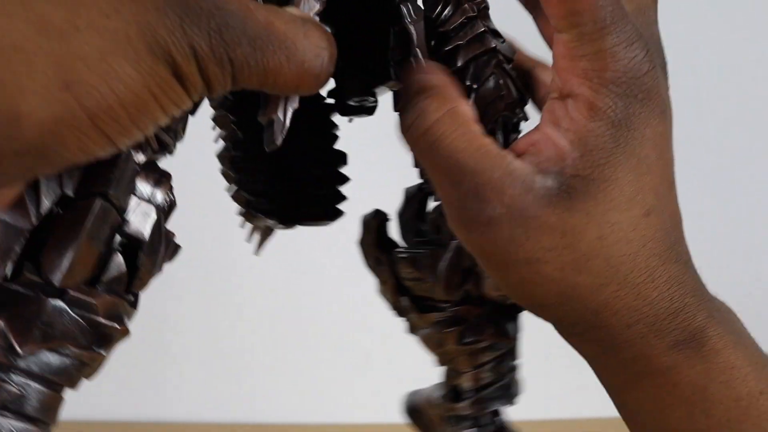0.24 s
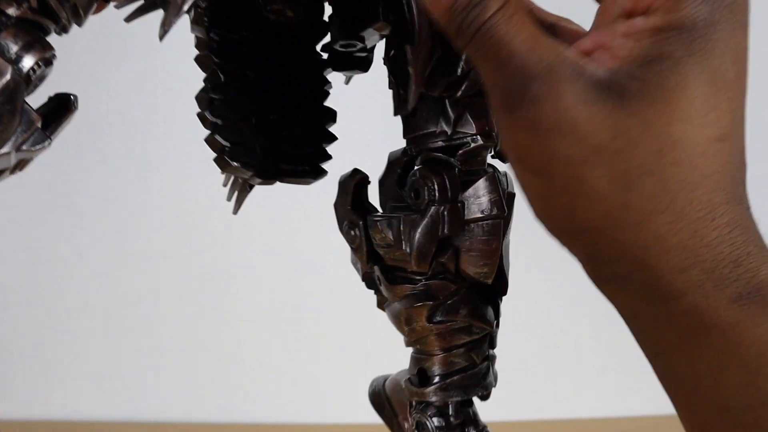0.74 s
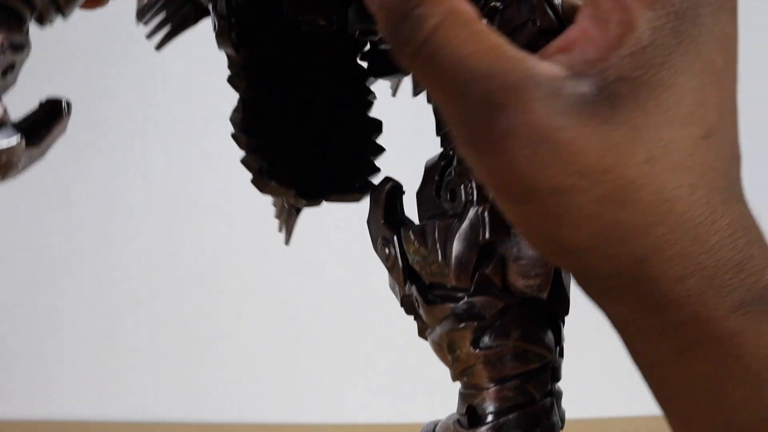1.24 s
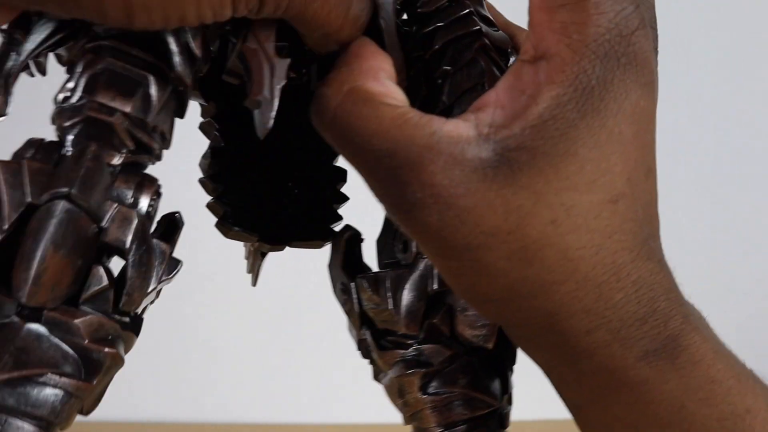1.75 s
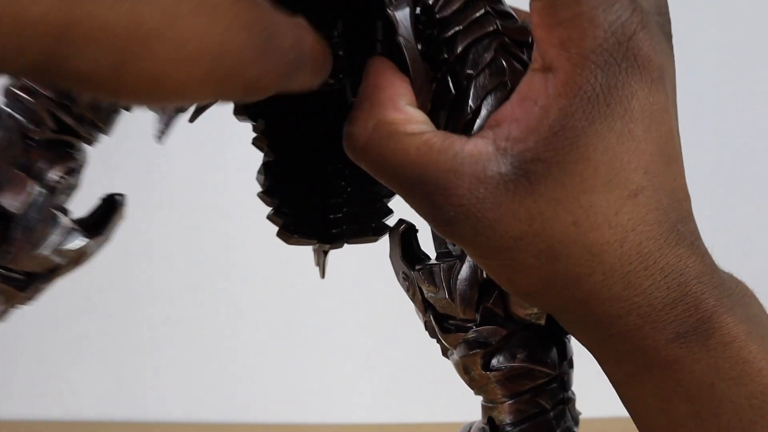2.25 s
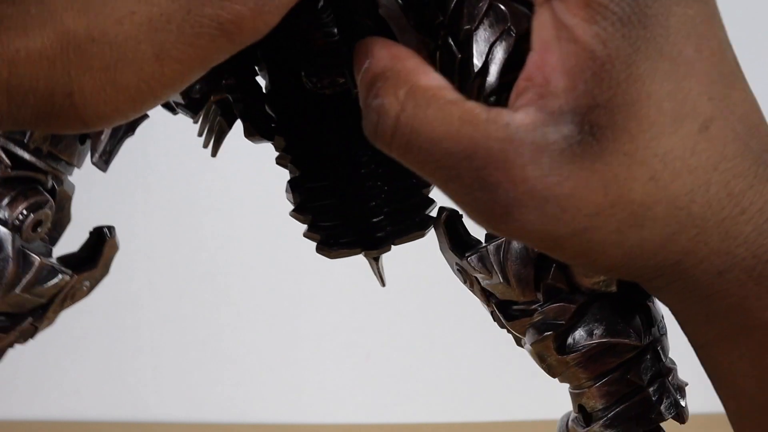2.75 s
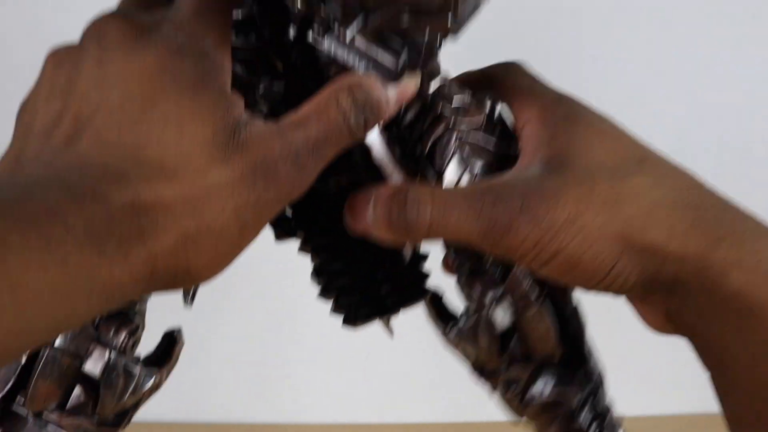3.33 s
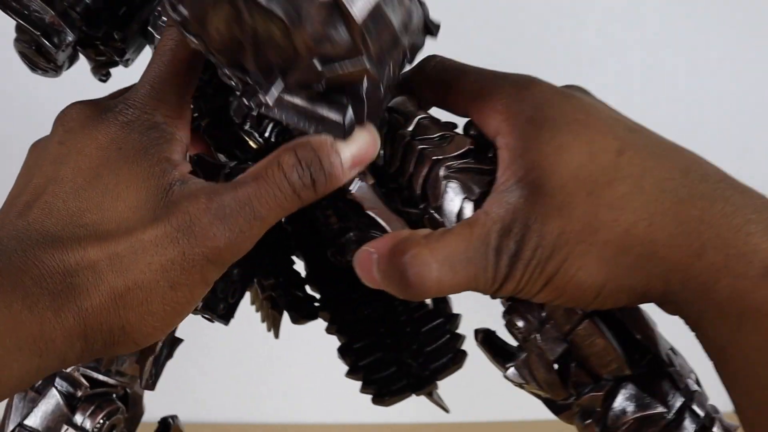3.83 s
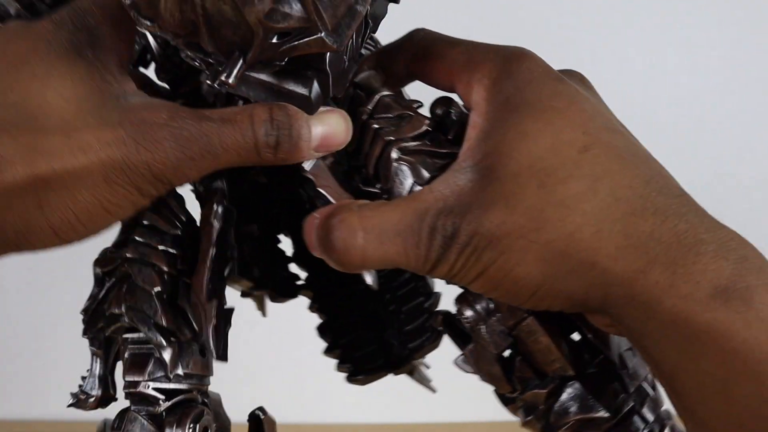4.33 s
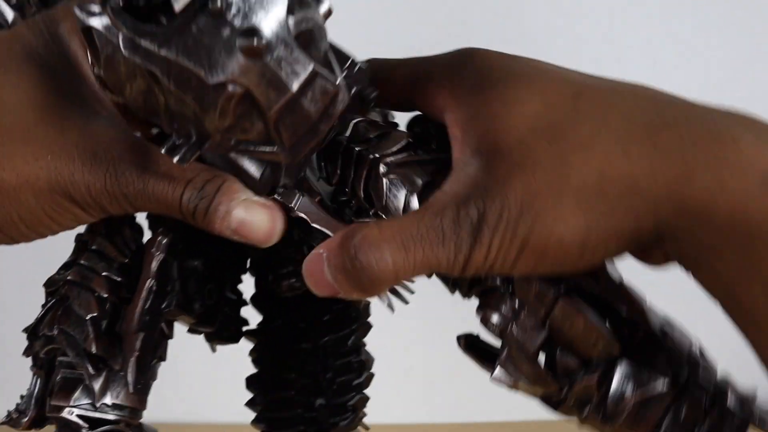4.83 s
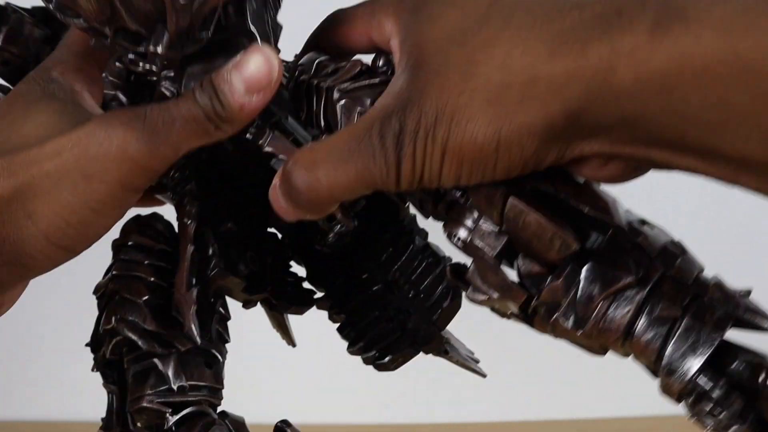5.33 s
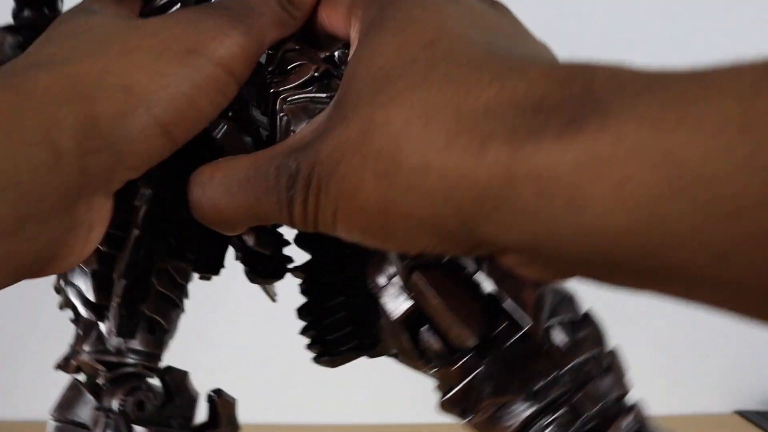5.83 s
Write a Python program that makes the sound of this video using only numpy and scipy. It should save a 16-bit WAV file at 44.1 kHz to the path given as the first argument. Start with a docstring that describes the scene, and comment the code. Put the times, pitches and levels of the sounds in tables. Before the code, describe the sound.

Fingers twist and pull jointed plastic parts. Dry stick-slip rubbing runs in short strokes, broken by bright clicks in an early group and scattered small ticks with tiny squeaks in the middle. Low handling bumps join, then several much louder, hollow snaps crack out late. Close microphone, short dull indoor reverberation, quiet mains hum and steady hiss.

```python
"""Hands pull apart and turn the parts of a hollow plastic figure close to a microphone in a small, damped room.
Rubbing opens the scene; snaps gather from 1.3 to 1.8 s, then lighter ticks, short tones and strokes of friction follow.
Toothed joints ratchet near 0.8 s and again before 5 s; the hardest snaps come from 5.4 to 5.8 s, and rubbing ends it.
Snaps are short rough forces, rubs are stick-slip noise; both excite the modes of the same plastic shells.
Low thuds and rustles of handling join in; mains hum and steady hiss lie under everything."""
import sys
import numpy as np
from scipy import signal
from scipy.fft import rfft, irfft
from scipy.io import wavfile
from scipy.ndimage import uniform_filter1d

SR = 44100
rng = np.random.default_rng(int(sys.argv[2]) if len(sys.argv) > 2 else 0)


def unload_audio(sound):
    """Save the sound as a 16-bit wav file, at the path given as the first command line argument."""
    columns = np.transpose(np.atleast_2d(sound))
    # keep every value between -1 and 1, then stretch to whole-number steps
    steps = np.round(np.clip(columns, -1, 1) * 32767)
    wavfile.write(sys.argv[1], SR, steps.astype(np.int16))


N = 267422
CLICK_LEN, LEAD = 4096, 64  # samples in one blow, and samples of it ahead of the contact

# resonant modes of the plastic shells: mode_hz, relative level_db, t60_s
SHELL_MODES = [(684, -19, 0.071), (740, -27, 0.037), (824, -14.5, 0.055), (884, -5, 0.031), (962, -4, 0.2),
               (1033, -0.5, 0.031), (1180, -21, .03), (1324, 4.5, 0.024), (1487, 11.5, 0.039),
               (1540, -5, 0.028), (1637, 17, 0.034), (1890, 15.5, .03), (2150, 2, .02), (2390, 7, 0.053),
               (2532, 7.5, .04), (2870, 6.5, .01), (2850, 5.5, 0.012), (3373, 7, 0.025), (3575, 5, 0.044),
               (3865, -0.5, 0.027), (4420, -30, 0.0039), (5370, -21.5, 0.0038), (5150, -13, 0.024),
               (6600, -19.5, 0.019)]


def undb(db):
    """Amplitude gain is ten to the power of decibels over twenty."""
    return 10 ** (np.asarray(db) / 20)


def unit(x):
    """Normalisation to an rms of 1."""
    return x / np.sqrt(np.mean(x ** 2))


def walk(rate_hz):
    """Slow random modulation of rms 1: levels held for 1 / rate_hz, smoothed by two moving averages."""
    hold = int(SR / rate_hz)
    steps = np.repeat(rng.standard_normal(N // hold + 1), hold)
    slewed = uniform_filter1d(uniform_filter1d(steps, hold), hold)
    return unit(slewed[:N])


def band(x, lo_hz, hi_hz):
    """Band-pass filtering by a Butterworth response."""
    return signal.sosfilt(signal.butter(2, [lo_hz, hi_hz], "band", fs=SR, output="sos"), x)


def clicks():
    """Impulsive excitation: every snap and tick of the joints; parts this small radiate no bass."""
    # snaps and ticks: start_s, struck part_hz, ring_db, contact_ms,
    # crack_db, crack centre_hz, fall below and above the centre in dB per octave
    snaps = [(0.3419, 3520, -69, 4.7, -55, 4200, 12, 7.5), (0.351, 3530, -54.5, 2.6, -50, 4500, 28, 25),
             (0.49, 2750, -63, 2.6, -54.5, 2560, 28, 12), (0.7531, 1120, -61, 2.8, -54, 1390, 11, 8.6),
             (1.04, 1270, -66, 5.2, -60, 3200, 4.8, 7.1), (1.1256, 4520, -69, 1.6, -61, 4600, 14, 4.4),
             (1.205, 1640, -75, 1.6, -55.5, 2800, 18, 6), (1.2625, 2860, -72, 4.9, -46.5, 3120, 20, 12.6),
             (1.305, 2860, -56, 3, -50, 3600, 20, 3.4), (1.324, 1340, -56, 7.4, -49, 2460, 15, 12),
             (1.37, 2900, -38, 2, -29, 3250, 26, 8.4), (1.569, 3250, -60, 1.9, -52.5, 3950, 19, 11),
             (1.654, 3900, -43.5, 2.2, -30, 3500, 18, 12.2), (1.71, 3800, -42, 2.4, -43.5, 4030, 6.9, 4),
             (1.7411, 3820, -53, 2.5, -34, 3450, 16.5, 6), (1.7602, 3920, -52, 0.87, -55, 4500, 7.1, 12),
             (1.8922, 5220, -67, 3.5, -54, 4670, 4.3, 7.7), (1.9474, 3500, -55, 2, -57, 4760, 25, 14),
             (2.0002, 2800, -62, 2, -61, 2610, 22, 8.4), (2.0658, 3920, -53, 6.9, -43.5, 3820, 14, 6.7),
             (2.1142, 2580, -56.5, 3.6, -55, 3640, 7.7, 6.1), (2.514, 1490, -73, 5.4, -69, 2500, 6, 8.9),
             (2.6617, 1480, -52, 3.3, -46, 1450, 23, 4.5), (2.6955, 1470, -43.5, 2, -49.5, 2800, 24, 6.2),
             (2.688, 2970, -52, 4, -49, 3300, 15, 9.8), (2.709, 5560, -68, 9.2, -49.5, 5650, 7.4, 9.2),
             (2.722, 3295, -63, 4.2, -50, 3160, 11, 13), (2.847, 1480, -65, 5, -62, 2200, 12, 2.2),
             (2.9917, 2280, -68, 1.5, -60, 2900, 14, 9.1), (3.0766, 4760, -78, 1.4, -66.5, 3800, 7.9, 5.1),
             (3.125, 2970, -72, 1.7, -68, 3000, 10, 10), (3.1317, 2340, -82, 1.7, -42, 2650, 9.3, 13.7),
             (3.1537, 2310, -64, 1.4, -55, 1320, 23, 22), (3.178, 3600, -70, 1.5, -63, 3000, 8, 11),
             (3.192, 1670, -65, 1.5, -62, 2500, 9.3, 10), (3.252, 2970, -72, 2, -70, 2000, 6, 12),
             (3.317, 2900, -72, 3, -68, 4000, 9.2, 6.1), (3.3367, 1200, -65, 4.8, -60.5, 1400, 37, 9.8),
             (3.4345, 1650, -48, 1.8, -50.5, 2350, 16, 39), (3.4543, 4720, -56, 1.5, -50, 5500, 9.4, 28),
             (3.4752, 2670, -51, 10.3, -44.5, 1880, 14.6, 6.5), (3.5439, 2520, -54, 4.4, -50, 2470, 30, 13),
             (3.6235, 1460, -44.5, 4.8, -46, 2360, 36, 19), (3.6432, 2160, -61, 2.7, -40.5, 2520, 25, 12.7),
             (3.649, 2160, -45.5, 0.85, -42, 2500, 8.5, 12), (3.661, 2310, -61, 0.89, -65, 2400, 15, 13),
             (3.8834, 2830, -67, 1.7, -61.5, 3600, 18, 13), (3.957, 2830, -63, 1.6, -65, 3700, 15, 12),
             (3.9706, 2860, -70, 0.77, -58, 2810, 24, 6.3), (4.0175, 1830, -64.5, 1.3, -62, 2300, 10, 7.7),
             (4.079, 2810, -68, 2.2, -64, 3500, 11, 15), (4.206, 3480, -60, 4.9, -47, 5200, 7, 14.4),
             (4.219, 2970, -62, 1.8, -58, 4000, 6.7, 14), (4.272, 1170, -63, 1.5, -64, 4500, 7.1, 9.2),
             (4.31, 3900, -67, 7.1, -61.5, 4400, 13, 8.5), (4.326, 3830, -68, 2, -61, 4300, 14, 13),
             (4.3592, 3950, -64, 2.9, -61, 4100, 26, 6.1), (4.642, 1440, -66.5, 3.8, -59.5, 1390, 26, 15),
             (4.6892, 1450, -84, 3.8, -56.5, 1390, 30, 30), (4.7124, 1400, -62, 1.5, -60, 1400, 14, 8.2),
             (4.781, 1450, -63, 2.1, -62, 1450, 29, 26), (4.836, 1450, -66, 2.9, -65, 1450, 34, 30),
             (4.921, 2080, -56, 1.8, -69, 2100, 20, 18), (4.945, 1460, -60, 4.2, -52, 1460, 17, 8),
             (5.029, 2970, -77, 1.5, -72, 3000, 10, 10), (5.2077, 1300, -79, 1.4, -54.5, 1330, 19, 12),
             (5.3, 2090, -76, 1.6, -60, 2000, 9.7, 15), (5.3658, 3090, -29.5, 1.4, -28, 4100, 10.5, 12.2),
             (5.371, 3850, -37, 0.51, -34, 4030, 9.3, 10), (5.4654, 760, -34.5, 4, -35, 1390, 4.2, 5.4),
             (5.472, 840, -48, 3.2, -35.5, 1190, 1.4, 5.4), (5.56, 880, -66, 2.2, -56, 2500, 22, 20),
             (5.5893, 1440, -32, 1.47, -16.5, 12200, 37, 4),
             (5.5894, 3136, -22.5, 1.35, -19, 6100, 6.6, 24),
             (5.7154, 1010, -34.5, 1.1, -31.5, 2400, 5, 11.4),
             (5.7809, 730, -28, 2.8, -30.5, 1870, 1.9, 5.9)]
    out = np.zeros(N + CLICK_LEN)
    blows = snaps + teeth()
    roughness = rng.standard_normal((len(blows), CLICK_LEN))
    for (start_s, *blow), noise in zip(blows, roughness):
        i = int(start_s * SR) - LEAD
        out[i:i + CLICK_LEN] += click(*blow, noise)
    return signal.sosfilt(signal.butter(6, 600, "high", fs=SR, output="sos"), out[:N])


def click(part_hz, ring_db, contact_ms, crack_db, crack_hz, below_db, above_db, noise,
          rise_share=0.57, rattle=0.3, rattle_t60_s=.04,
          hollow_hz=1060, hollow_db=3, trunk_hz=750, detune=.015):
    """Forced modal vibration: a rough contact of a few ms cracks broadly and rings modes near the struck part."""
    # colour that every crack shares: frequency_hz, level_db
    crack_colour = [(450, -20.5), (750, -4), (1400, -2.5), (2500, -2), (4000, -1), (6000, -1.5),
                    (8500, -4.5), (13000, -5.5)]
    t = np.arange(CLICK_LEN) / SR
    f = np.fft.rfftfreq(len(t), 1 / SR) + 1  # the offset keeps the logarithms finite
    octaves = np.log2(f / crack_hz)
    colour_db = crack_db + np.where(octaves < 0, below_db, -above_db) * octaves
    shared_hz, shared_db = np.array(crack_colour).T
    colour_db = colour_db + np.interp(np.log(f), np.log(shared_hz), shared_db)

    push_s = max(contact_ms, .3) / 1000
    onset = 1 - np.exp(-t / (rise_share * push_s))
    fall = np.exp(-(t / push_s) ** 2) + rattle * 1000. ** (-t / rattle_t60_s)
    force = noise * onset * fall

    hz, db, t60_s = np.array(SHELL_MODES).T[:, :, None]
    hz = hz * (1 + detune * noise[-len(hz):, None])  # mode pitches vary slightly at random from blow to blow
    near = undb(db) * np.exp(-(np.log(hz / part_hz) / .06) ** 2)  # neighbours within a few percent
    modes = np.sin(2 * np.pi * hz * t) * 1000. ** (-t / t60_s)
    ring = signal.fftconvolve((near * modes).sum(axis=0), force)[:len(t)]
    # every blow also sounds the hollow trunk, in step with the bottom of its crack
    trunk_modes = (undb(db) * modes)[hz[:, 0] < hollow_hz]
    hollow = signal.fftconvolve(trunk_modes.sum(axis=0), force)[:len(t)]
    trunk_db = np.interp(trunk_hz, f, colour_db) + hollow_db
    ring = undb(ring_db) * ring / np.linalg.norm(ring)
    ring = ring + undb(trunk_db) * hollow / np.linalg.norm(hollow)

    # the many small modes blur into a smooth colour; a half octave holds bins in proportion to its pitch
    colour = undb(colour_db) / np.sqrt(f * np.log(2) / SR)
    spectrum = rfft(np.roll(force, LEAD))
    envelope = np.sqrt(uniform_filter1d(np.abs(spectrum) ** 2, size=60))
    crack = irfft(colour * spectrum / envelope)
    fade = np.clip((1 - t / t[-1]) * 4, 0, 1) ** 2
    sound = crack + np.pad(ring, (LEAD, 0))[:len(t)]
    return sound * fade * np.sqrt(.007 * SR)  # levels state the energy as an rms over 7 ms


def teeth():
    """Periodic impacts of a toothed joint: evenly spaced blows, each a little off in time and level."""
    # a toothed joint turning: first tooth_s, last tooth_s, teeth per s, crack_db
    ratchets = [(0.788, 0.853, 63, -64.5), (4.765, 4.834, 77, -61), (4.917, 4.931, 100, -56.5),
                (4.942, 4.979, 108, -59.5)]
    # every tooth: part_hz, ring below the crack in dB, contact_ms, crack centre_hz,
    # fall below and above the centre in dB per octave
    tooth = (3700, 14, 2.9, 3600, 25, 12.2)
    scatter_s, scatter_db = .0008, 2.5
    part_hz, under_db, contact_ms, *colour = tooth
    rows = []
    for first_s, last_s, rate, db in ratchets:
        times = np.linspace(first_s, last_s, round((last_s - first_s) * rate) + 1)
        for s, (late, loud) in zip(times, rng.standard_normal((len(times), 2))):
            crack_db = db + scatter_db * loud
            rows.append((s + scatter_s * late, part_hz, crack_db - under_db, contact_ms, crack_db, *colour))
    return rows


def rubbing(slips_per_s=250, slip_size=2.3, low_hz=2000):
    """Stick-slip friction: grains over fine noise ring the shell; skin and handling add smooth noise bands."""
    # strokes of part on part: firmest contact_s, rise_s, fall_s, middle modes level_db, low modes level_db
    strokes = [(0.146, 0.081, 0.088, -71.5, -97), (0.343, 0.059, 0.059, -64, -62.5),
               (0.445, 0.096, 0.094, -58.5, -56), (0.68, 0.043, 0.026, -57.5, -52.5),
               (0.78, 0.12, 0.16, -74, -66), (0.95, 0.039, .07, -72.5, -86), (1.119, .1, 0.058, -67, -63),
               (1.196, 0.059, .13, -54, -55.5), (1.367, 0.22, 0.17, -69, -71),
               (1.566, 0.8, .15, -65.5, -73.5), (1.66, .07, .3, -61, -81), (1.798, 0.33, 0.11, -60, -60.5),
               (1.946, 0.061, 0.038, -58, -61.5), (2.065, 0.1, 0.083, -58.5, -68),
               (2.175, 0.059, 0.07, -63, -57), (2.291, 0.18, 0.18, -57, -62.5),
               (2.442, 0.032, 0.038, -53.5, -75), (2.708, 0.16, 0.17, -61.5, -60.5),
               (2.877, 0.12, 0.14, -65, -64), (3.05, 0.25, 0.33, -73, -71), (3.19, 0.12, 0.059, -70, -67.5),
               (3.345, 0.034, 0.44, -69, -67.5), (3.484, 0.13, 0.32, -63.5, -61),
               (3.645, 0.033, 0.22, -67, -57), (3.877, 0.025, 0.34, -69, -66),
               (3.971, 0.095, 0.094, -81, -65.5), (4.118, 0.034, 0.16, -54.5, -53),
               (4.214, 0.066, 0.092, -59, -59), (4.33, .04, 0.11, -68, -64.5),
               (4.677, 0.15, 0.11, -67.5, -83), (4.823, 0.21, 0.17, -70, -64.5),
               (4.954, 0.054, 0.058, -66, -60), (5.02, 0.059, 0.12, -82, -67.5),
               (5.216, 0.024, 0.075, -75, -69), (5.36, .13, 0.13, -72.5, -68.5),
               (5.837, 0.48, 0.11, -63.5, -74.5), (6.06, 0.3, .1, -72, -80.5)]
    # fingertips sliding over the shell: peak_s, rise_s, fall_s, hiss level_db
    slides = [(0.681, 0.062, 0.055, -67.5), (1.197, 0.044, 0.067, -61.5), (1.566, 0.1, 0.039, -63.5),
              (1.798, 0.24, 0.04, -64.5), (1.946, 0.06, .15, -71), (2.31, .15, 0.14, -63),
              (2.383, .05, .02, -60), (2.465, 0.033, .03, -69), (3.129, .03, 0.047, -72),
              (5.414, 0.064, 0.25, -67)]
    # low thuds and rustles of handling: peak_s, rise_s, fall_s, level_db
    thuds = [(0.41, .2, 0.31, -72), (0.75, 0.091, 0.13, -74), (1.8, 0.73, 0.25, -72.5),
             (2.0, 0.082, .1, -71), (2.29, 0.5, 0.03, -82), (3.63, 0.27, 0.2, -71.5),
             (4.129, 0.056, .1, -66.5), (4.214, 0.05, .07, -76), (4.33, 0.013, 0.087, -67.5),
             (4.707, .02, 0.072, -57.5), (4.823, 0.1, 0.067, -69), (4.953, 0.02, 0.34, -63),
             (5.47, .01, 0.033, -51.5), (5.59, 0.011, 0.06, -59), (5.785, 0.011, 0.042, -55)]
    # steady noise level_db under the gestures, in four bands: middle modes, low modes, skin, handling
    steady_db = (-85, -78.5, -80, -80.5)

    grains = (rng.random(N) < slips_per_s / SR) * slip_size * rng.random(N)
    grip = 1 + signal.lfilter([1], [1, -.975], grains)  # each slip decays within milliseconds
    friction = rng.standard_normal(N) * grip * undb(0.99 * walk(40))
    low, middle = 0, 0
    for hz, db, t60_s in SHELL_MODES:
        r = 1000. ** (-1 / (t60_s * SR))  # pole radius of a two-pole resonator
        ring = unit(signal.lfilter([1, 0, -1], [1, -2 * r * np.cos(2 * np.pi * hz / SR), r * r], friction))
        ring = ring * undb(db + 4 * walk(25))  # the grip moves, so modes come and go
        low = low + ring * (hz < low_hz)
        middle = middle + ring * (hz >= low_hz)
    # broad friction noise fills between the modes
    middle = unit(middle) + .9 * unit(band(band(friction, 1900, 7000), 1500, 7500))
    low = unit(low) + 1.6 * unit(band(friction, 450, 2800))

    smooth = rng.standard_normal(N) * undb(2.0 * walk(60))  # no sharp slips here
    skin = unit(band(smooth, 4700, 14680))
    handling = unit(band(smooth, 66, 620))

    middle_strokes = [(s, rise, fall, db) for s, rise, fall, db, _ in strokes]
    low_strokes = [(s, rise, fall, db) for s, rise, fall, _, db in strokes]
    parts = unit(middle) * swells(middle_strokes, steady_db[0])
    parts = parts + unit(low) * swells(low_strokes, steady_db[1])
    return parts + skin * swells(slides, steady_db[2]) + handling * swells(thuds, steady_db[3])


def swells(rows, steady_db, swell_db=20):
    """Addition of powers: gestures over a steady level, each changing by swell_db in its rise and its fall."""
    t, power = np.arange(N) / SR, undb(steady_db) ** 2
    for s, rise_s, fall_s, db in rows:
        away = np.where(t < s, (s - t) / max(rise_s, .01), (t - s) / max(fall_s, .01))
        power = power + undb(db - swell_db * away) ** 2
    return np.sqrt(power)


def narrow_tones(width_hz=60, evenness=0.66):
    """Narrow-band noise is heard as a wavering pitch: short squeaks and ringing."""
    # short narrow tones, squeaks and ringing: start_s, length_s, pitch_hz, level_db
    tone_rows = [(0.308, 0.022, 3480, -60.5), (0.363, 0.094, 1650, -63.5), (0.682, 0.017, 3570, -58),
                 (3.044, 0.063, 1430, -76), (3.473, 0.026, 2425, -49), (3.535, 0.044, 2410, -60.5),
                 (3.679, 0.037, 1320, -58), (4.089, 0.081, 1630, -59), (4.052, 0.22, 476, -70),
                 (3.672, 0.033, 3900, -62), (4.098, 0.035, 4080, -60.5), (4.1, .04, 2800, -62)]
    t, out = np.arange(N) / SR, 0
    for start_s, length_s, hz, level_db in tone_rows:
        tone = band(rng.standard_normal(N), hz - width_hz, hz + width_hz)
        tone = unit(tone / np.abs(signal.hilbert(tone)) ** evenness)  # evens out the loudness
        arch = np.sqrt(np.sin(np.pi * np.clip((t - start_s) / length_s, 0, 1)).clip(0))
        out = out + undb(level_db) * tone * arch
    return out


def room(x, t60_s=0.24, tail_db=-12.5, dull_hz=6000):
    """Reverberation as decaying noise: dense echoes of a small room, whose treble dies sooner."""
    t = np.arange(int(.4 * SR)) / SR
    build_up = 1 - np.exp(-(t / 0.0027) ** 2)
    bright = rng.standard_normal(len(t)) * build_up * 1000. ** (-t / t60_s)
    dull = signal.lfilter(*signal.butter(1, dull_hz, fs=SR), bright)
    deep = signal.lfilter(*signal.butter(1, 1200, fs=SR), bright) * (np.exp(t / 0.28) - 1)  # low modes linger
    tail = deep + dull + (bright - dull) * 1000. ** (-t / 0.093)
    return x + undb(tail_db) * signal.fftconvolve(x, tail / np.sqrt(np.sum(tail ** 2)))[:N]


def floor(hiss_db=-78):
    """Stationary background: mains hum as a sum of sines near odd multiples, over steady shaped noise."""
    # mains hum: pitch_hz, rms level_db
    hum_lines = [(60.0, -53.5), (180, -90.5), (301, -82), (420, -84.5)]
    # spectrum of the hiss: frequency_hz, relative density in dB per Hz
    hiss_colour = [(40, -5.5), (100, -0.5), (300, -6), (500, -12), (1500, -16.5), (4000, -15.5),
                   (8000, -34.5), (15000, -23), (17000, -24.5)]
    t, hum = np.arange(N) / SR, 0
    for hz, db in hum_lines:
        hum = hum + np.sqrt(2) * undb(db) * np.sin(2 * np.pi * (hz * t + rng.random()))
    hz, db = np.transpose(hiss_colour)
    shape = undb(np.interp(np.log(np.fft.rfftfreq(N, 1 / SR) + 1), np.log(hz), db))
    hiss = unit(irfft(rfft(rng.standard_normal(N)) * shape, N))
    return hum + undb(hiss_db) * hiss


def scene():
    """Superposition: the figure sounds in the room, over the floor."""
    figure = clicks() + rubbing() + narrow_tones()
    return (room(figure) + floor())[None]


def record(dry, top_hz=16000):
    """Low-pass filtering: the recorder cuts the top with a steep elliptic response."""
    return signal.sosfilt(signal.ellip(8, .2, 70, top_hz, fs=SR, output="sos"), dry)


dry = scene()
out = record(dry)
unload_audio(out)
```